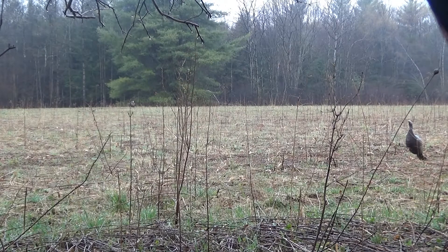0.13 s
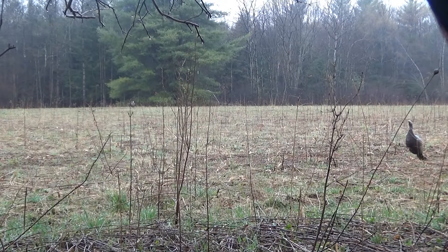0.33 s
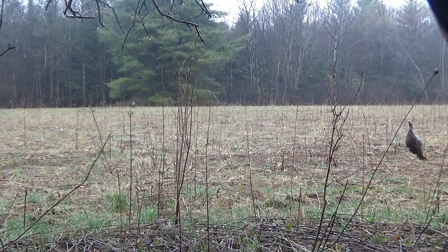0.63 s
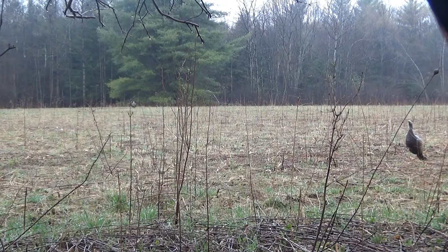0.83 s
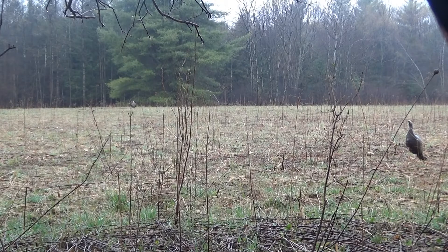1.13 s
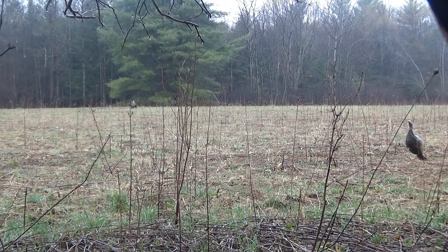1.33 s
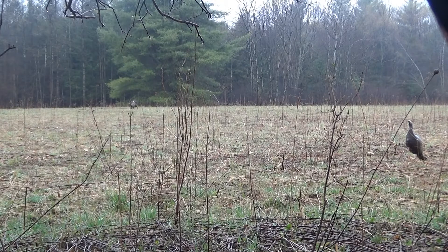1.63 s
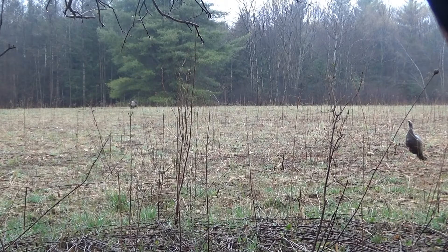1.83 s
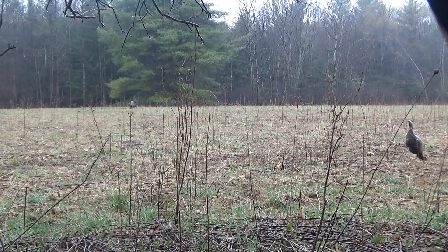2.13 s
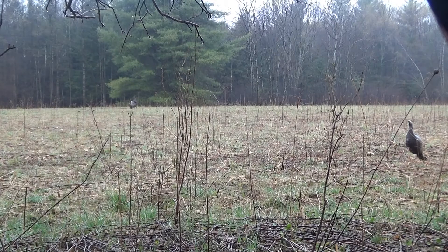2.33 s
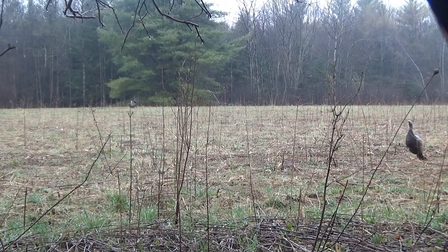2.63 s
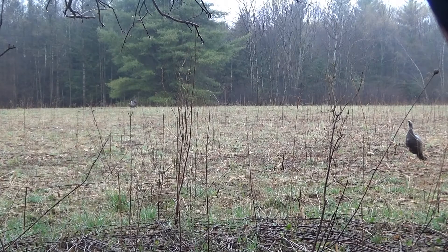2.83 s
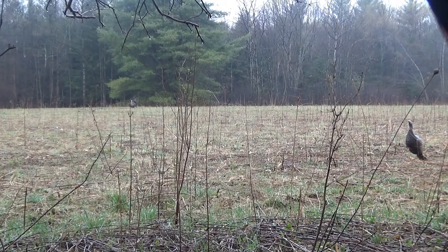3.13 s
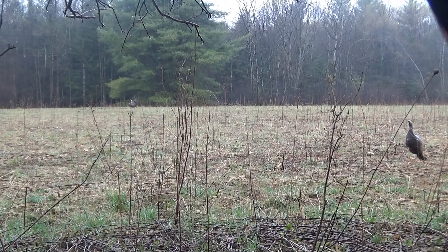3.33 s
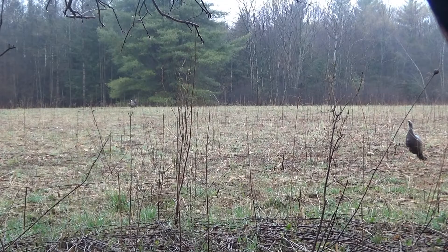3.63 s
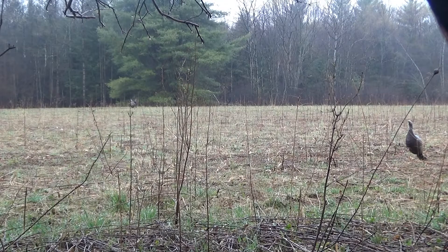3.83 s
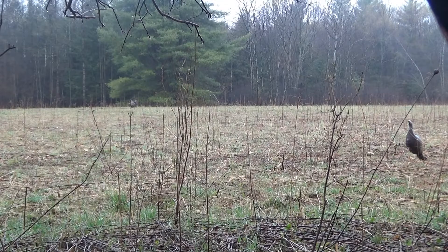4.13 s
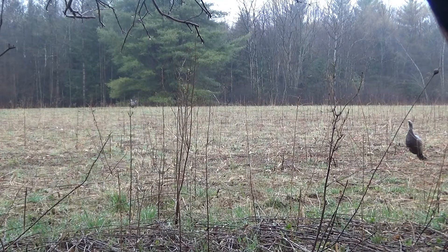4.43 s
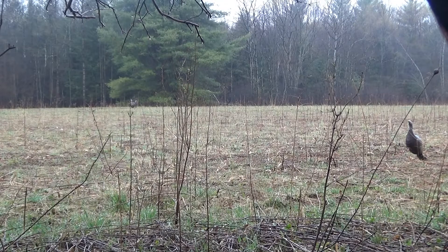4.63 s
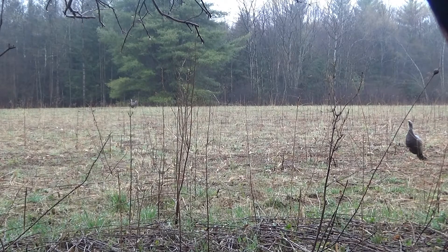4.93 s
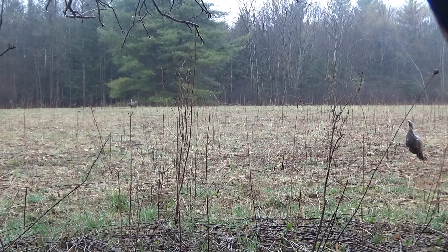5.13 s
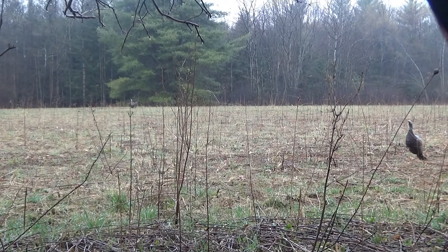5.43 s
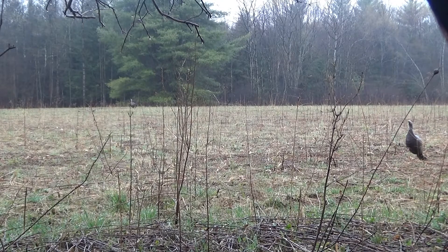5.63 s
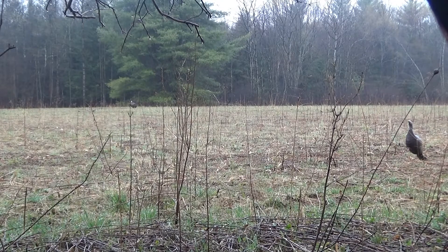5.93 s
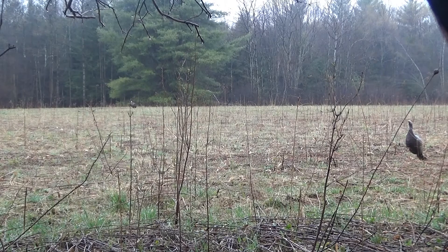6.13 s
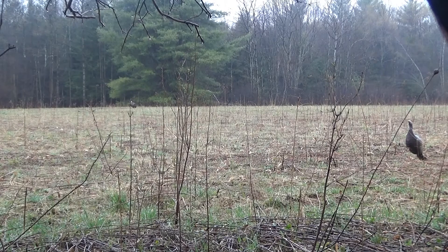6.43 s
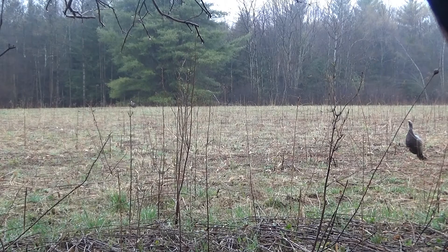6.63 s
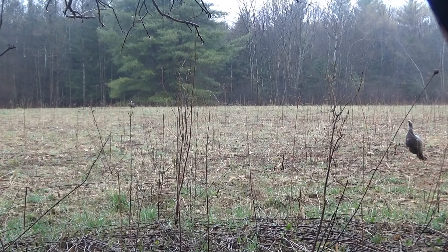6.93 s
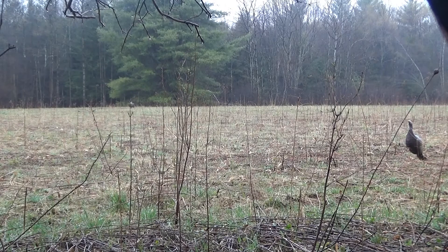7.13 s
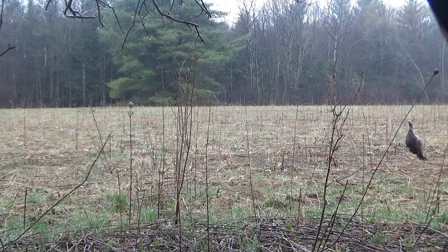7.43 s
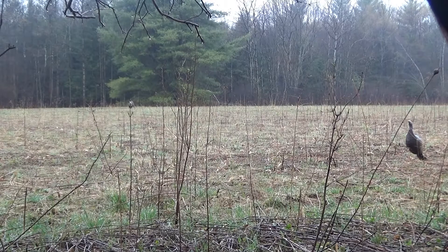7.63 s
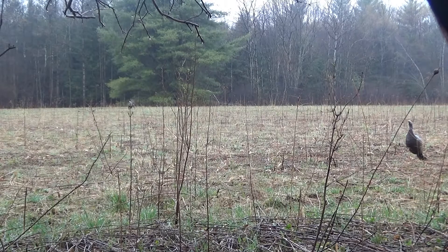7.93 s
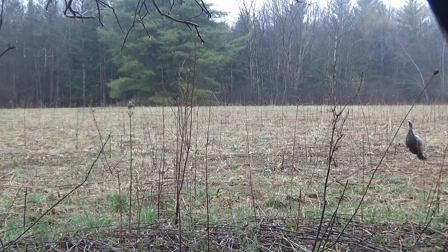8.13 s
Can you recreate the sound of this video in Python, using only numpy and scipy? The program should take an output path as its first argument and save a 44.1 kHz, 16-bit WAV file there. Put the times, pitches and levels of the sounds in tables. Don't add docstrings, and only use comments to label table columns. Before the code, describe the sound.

A quiet open field edged by woods, with soft low rumble, distant traffic, a faint wavering engine hum and thin microphone hiss. At 0.5 s a turkey close by on the right begins with a faint pip and a soft, high, clear yelp, alongside a tiny chirp. Hoarse yelps follow at about 0.85, 1.2, 1.6, 1.95, 2.3, 2.7 and 3.0 s, each roughly a tenth of a second, starting high and dropping into a raspy, fluttering, breathy tone; the last few are loudest. The background dips after the loud calls, then slowly rises. Soft far clucks come near 3.4 s and a faint one at 4.9 s. From 5.7 to 6.5 s a farther tom gives a rapid, uneven, rattling gobble, its tone lingering off the trees. Dry twig ticks and little drips are scattered throughout, with crisp ticks around 8.0 s before the end.

```python
import sys
import numpy as np
from scipy import signal
from scipy.fft import rfft, irfft, next_fast_len
from scipy.io import wavfile
from scipy.ndimage import uniform_filter1d, map_coordinates

SR = 44100
rng = np.random.default_rng(int(sys.argv[2]) if len(sys.argv) > 2 else 0)


def wav_out(sig):
    wavfile.write(sys.argv[1], SR, np.round(np.clip(np.atleast_2d(sig).T, -1, 1) * 32767).astype(np.int16))


def rack_gain(trim_db):
    fader = np.asarray(trim_db, float)
    return 10 ** (fader / 20)


N = 365280

# centre time [s], pitch [Hz], length [s], throat level [dB], open beak [dB re throat].
GOBBLE_NOTES = [(5.679, 526, 0.018, -23.5, -15.5), (5.736, 572, 0.043, -29, -10),
                (5.751, 636, .004, -28, 0), (5.812, 534, .015, -45.5, 5), (5.869, 690, 0.018, -38, 5),
                (5.906, 552, .01, -29, 5), (5.935, 611, 0.048, -35, 3.5), (5.947, 624, 0.012, -27.5, -3.5),
                (6.012, 591, .014, -31.5, -1.5), (6.062, 634, 0.026, -37, 4), (6.109, 614, 0.055, -31.5, 6),
                (6.115, 650, 0.017, -30.5, -3.5), (6.175, 579, 0.019, -36.5, -2.5),
                (6.218, 592, 0.015, -42.5, 5), (6.301, 564, .024, -35.5, -5.5),
                (6.361, 573.6, .013, -34.5, -1), (6.387, 565, 0.017, -41.5, 9.5),
                (6.468, 550, 0.022, -38.5, -5), (6.523, 589, 0.034, -45.5, 1.5)]
# time [s], centre [Hz].
TOM_THROAT = [(5.72, 1770), (5.75, 1380), (5.82, 1310), (5.87, 2000), (5.905, 1050), (5.95, 1980),
              (6.06, 1220), (6.1, 1850), (6.3, 1830)]
# frequency [Hz], t60 [s].
BRUSH_DECAY = [(500, 0.066), (1700, 0.089), (4000, 0.11), (9000, 0.034)]


def unit(x):
    return x / np.sqrt(np.mean(x ** 2) + 1e-20)


def along(points, hz):
    f, v = np.transpose(points)
    return np.interp(np.log(hz + 1), np.log(f + 1), v)


def curves(rows, t):
    s, *cols = np.transpose(rows)
    return [np.interp(t, s, c) for c in cols]


def wobble(rate_hz, size=N):
    knots = rng.standard_normal(int(size * rate_hz / SR) + 4)
    return map_coordinates(knots, [np.arange(size) * rate_hz / SR])


def fuzzy_phase(hz):
    return 2 * np.pi * np.cumsum(hz) / SR


def filtered(x, response):
    size = x.shape[-1]
    m = next_fast_len(size + 8192)
    return irfft(rfft(x, m) * response(np.fft.rfftfreq(m, 1 / SR)), m)[..., :size]


def resonances(modes):
    def response(f):
        return sum((-1) ** k * rack_gain(db) * 1j * f * width / (centre * centre - f * f + 1j * f * width)
                   for k, (centre, width, db) in enumerate(modes))
    return response


def band(lo_hz, hi_hz):
    return lambda f: 1 / (1 + (lo_hz / (f + 1)) ** 6) / (1 + (f / hi_hz) ** 6)


def pulses(phase, hz):
    return sum(np.cos(k * phase) * (k * hz < 15000) for k in range(1, 28))


def echoes(x, decay, delay_s):
    hz, t, z = signal.stft(rng.standard_normal((2, SR)), SR, nperseg=256)
    decay_db = -60 * t / along(decay, hz)[:, None]
    tail = signal.istft(z * rack_gain(decay_db), SR, nperseg=256)[1]
    delayed = np.pad(x, (int(delay_s * SR), 0))
    return signal.fftconvolve(delayed[None], tail / np.linalg.norm(tail[0]), axes=1)


def push(attack_s, hold_s, low_hz, sag_db, rise):
    attack_power, sag_power, release_db_per_s = 1.28, 2.7, 900
    opening_rise, settle_share, fall_power = 0.9, 0.88, 1.5
    droop, rise_power, early_climb = 0.05, 3.4, 2.2
    t = np.arange(round((attack_s + hold_s) * SR) + SR // 20) / SR
    late = np.maximum(t - attack_s, 0) / hold_s
    effort_db = 20 * attack_power * np.log10(np.clip(t / attack_s, 0.01, 1))
    effort_db -= sag_db * np.minimum(late, 1) ** sag_power
    effort_db -= release_db_per_s * np.maximum(t - attack_s - hold_s, 0)
    opening = droop * (1 - np.minimum(late, 1))
    opening += opening_rise * np.maximum(1 - t / (settle_share * attack_s), 0) ** fall_power
    closing = rise * np.minimum(late, 1.4) ** (rise_power / (1 + early_climb * rise))
    return effort_db, low_hz * (1 + opening + closing)


def yelps():
    # start [s], attack [s], hold [s], peak [dB], lowest pitch [Hz].
    calls = [
        (0.5, 0.01, 0.0027, -40, 783),
        (0.527, .006, 0.093, -46, 793),
        (0.836, .065, .03, -23.5, 523),
        (1.222, .022, .088, -21, 580),
        (1.565, 0.043, 0.073, -13.5, 517),
        (1.944, 0.049, .065, -18, 569.5),
        (2.301, .03, 0.087, -13, 530),
        (2.671, 0.025, 0.069, -12.5, 528.3),
        (2.997, 0.013, .065, -13, 510.4),
    ]
    roughness = [.9, .9, .85, .75, .65, .55, .7, .7, .8]
    # brightness [dB], throat pitch factor, sag over the hold [dB], closing pitch rise [share].
    shapes = [(3, 1.1, -1, -0.091), (18, .93, 23, -0.1), (2, 1.0, 6, 0.35), (0, 1.02, 3.5, .5),
              (1, 1.028, 5.5, 0.014), (5.5, 1, 17, .6), (7, 1.01, 1.5, .07), (6.5, 1.01, 8, .08),
              (-0.5, 1.029, -0.4, -.02)]
    # clear tone, breath hiss [dB re the usual].
    mixes = [(-6, -1), (-8, -6), (-2, -0.5), (3, -3.5), (-0.5, 2.5), (4.5, 1), (-1, 1), (-1, 0), (0, -1.5)]
    # centre [Hz], width [Hz], level [dB].
    throat_modes = [(1104, 410, -8), (1480, 87, 0), (1651, 46, 4.5), (1800, 40, 4), (1980, 88, -2),
                    (2370, 260, -11.5), (3010, 170, -7.5), (3373, 44, -4), (3603, 115, -9),
                    (4350, 400, -23)]
    # frequency [Hz], density [dB per Hz].
    breath_spectrum = [(2530, -60), (4300, -10), (5810, -13), (6900, -8), (7510, -2.5), (7910, -1),
                       (8960, -10), (11100, -37), (12000, -21), (15600, -66), (22000, -120)]
    # frequency [Hz], left-right balance [dB].
    balance = [(200, -4), (700, -1), (1300, -4.5), (4400, -3), (8000, 1.5)]
    usual_tone_db, usual_hiss_db = -15, -16
    weak_tone, weak_hiss, weak_top_db = 0.69, 0.16, 17
    sag_tone, close_tone_db_per_s = 0.47, 300

    def sides(f):
        gain = rack_gain(np.outer([0.5, -0.5], along(balance, f)))
        return gain * np.exp(-1j * np.outer([1, -1], 0.4 * band(900, 3600)(f)))

    out = np.zeros((2, N + 2 * SR))
    for call_row, rough, shape, (clear_db, breath_db) in zip(calls, roughness, shapes, mixes):
        s, attack_s, hold_s, peak_db, low_hz = call_row
        bright_db, factor, sag_db, rise = shape
        effort_db, hz = push(attack_s, hold_s, low_hz, sag_db, rise)
        size = len(hz)
        age = np.arange(size) / SR
        weak_db = np.minimum(-effort_db, weak_top_db)
        tone_db = usual_tone_db + clear_db + weak_tone * weak_db - sag_tone * weak_db * (age > attack_s)
        tone_db -= close_tone_db_per_s * np.maximum(age - attack_s - hold_s, 0)
        hiss_db = usual_hiss_db + breath_db + weak_hiss * weak_db

        phase = fuzzy_phase(hz * (1 + 0.0189 * wobble(314.3, size)))
        gated = rng.standard_normal(size) * (1 + np.cos(phase)) ** 2
        beat = fuzzy_phase(122 * (1 + 0.198 * wobble(52.8, size)))
        bursts = rack_gain(1.1 * wobble(280, size)) * (1 + 0.3 * np.cos(beat))
        air = bursts * (np.sqrt(1 - rough) * unit(pulses(phase, hz)) + np.sqrt(rough) * unit(gated))

        def throat(f):
            return resonances(throat_modes)(f / factor) * rack_gain(bright_db * band(2600, 9000)(f))

        rasp = unit(filtered(filtered(air, throat), band(570, 3610)))
        breath = bursts ** 0.66 * rng.standard_normal(size)
        hiss = unit(filtered(breath, lambda f: rack_gain(along(breath_spectrum, f))))
        tone = np.sqrt(2) * rack_gain(2.2 * wobble(160, size)) * np.sin(phase)
        call = rack_gain(peak_db + effort_db) * (rasp + rack_gain(tone_db) * tone + rack_gain(hiss_db) * hiss)

        start = round(s * SR)
        out[:, start:][:, :size] += filtered(call, sides)
        wet = rack_gain(-8) * echoes(filtered(call, band(800, 14000)), BRUSH_DECAY, delay_s=0.002)
        out[:, start:][:, :wet.shape[1]] += wet
    return out[:, :N]


def gobble():
    grits = [.9, 1.7, .5, 1.5, 1.8, 1.5, 1.6, 1.3, .8, 1.8, 1.2, .5, 1.1, 1.6, .6, .8, 1.5, .8, 1.4]
    spit_db = [-18, -11, 0.5, -10, -10, -13, -9, -14.5, -17, -11, -6, -1, -12, -10, -15, -10, -2, -18, -11]
    # frequency [Hz], t60 [s].
    tree_decay = [(700, 0.59), (1100, 4.5), (1800, 0.63), (2600, 1.2), (5000, 0.061), (10000, 0.048)]
    dry = np.zeros(N)
    t = np.arange(-2000, 2000) / SR
    size = len(t)
    for (s, hz, length_s, low_db, beak_db), grit, top_db in zip(GOBBLE_NOTES, grits, spit_db):
        phase = fuzzy_phase(hz * (1 + 0.007 * (1 + 1.4 * grit) * wobble(250, size)))
        gated = rng.standard_normal(size) * (1 + np.cos(phase))
        air = unit(pulses(phase, hz)) + grit * unit(filtered(gated, lambda f: np.sqrt(f / 4000)))

        throat = resonances([(curves(TOM_THROAT, s)[0], 600, 0)])
        low = unit(filtered(air, lambda f: throat(f) ** 2 * band(950, 2600)(f)))
        beak_modes = [(rng.uniform(2200, 2500), 400, -1), (rng.uniform(3100, 3600), 600, 0),
                      (rng.uniform(4500, 5800), 1200, -4)]
        beak = unit(filtered(filtered(air, resonances(beak_modes)), band(1500, 6600)))
        spit = unit(filtered(air, lambda f: band(6200, 10000)(f) * band(100, 11500)(f)))

        low_swell = np.exp(-(t / (0.48 * length_s + 0.008)) ** 2)
        beak_swell = np.exp(-(t / (0.81 * min(length_s, 0.024))) ** 2)
        note = low_swell * low + beak_swell * (rack_gain(beak_db) * beak + rack_gain(top_db) * spit)
        level = rack_gain(low_db + 2 * grit * wobble(200, size))
        dry[round(s * SR) - 2000:][:size] += level * note
    near = echoes(dry, BRUSH_DECAY, delay_s=0.0044)[:, :N]
    far = echoes(dry, tree_decay, delay_s=0.028)[:, :N]
    return dry + rack_gain(-10) * near + rack_gain(-13) * far


def ring(held, pitch, blur_hz):
    detune_octaves, echo_rise_s = 0.34, 0.0061
    t = np.arange(N) / SR
    db, t60_s, far_db, far_t60_s = held
    power = np.zeros(N)
    for s, _, _, low_db, _ in GOBBLE_NOTES:
        detune = abs(np.log2(curves(TOM_THROAT, s)[0] / curves(pitch, s)[0]))
        fed_db = low_db + db - 4.3 * (detune / detune_octaves) ** 2
        age = np.maximum(t - s + echo_rise_s, 0)
        fade = rack_gain(-120 * age / t60_s) + rack_gain(2 * far_db - 120 * age / far_t60_s)
        power += rack_gain(2 * fed_db) * np.minimum(age / echo_rise_s, 1) ** 2 * fade
    carrier = np.exp(1j * fuzzy_phase(curves(pitch, t)[0]))

    def flutter():
        return wobble(blur_hz) + 1j * wobble(blur_hz)

    shared = flutter()
    left = (shared + 0.5 * flutter()) * carrier
    right = (shared + 0.5 * flutter()) * carrier
    return np.sqrt(power) * unit(np.real([left, right]))


def held_by_trees():
    # time [s], frequency [Hz].
    low_hz = [(5.72, 1263), (5.855, 1267), (5.87, 1101), (6.149, 1102), (6.301, 1026), (6.9, 1024)]
    high_hz = [(5.66, 1613), (5.73, 1620), (5.781, 1750), (5.95, 1856), (6.101, 1800), (6.202, 1720),
               (7.1, 1698)]
    # level [dB re note], t60 [s], far trees [dB], their t60 [s].
    held_low = (-8, 2.7, -13, 3)
    held_high = (-2.5, 0.25, -20, 5)
    return ring(held_low, low_hz, blur_hz=220) + ring(held_high, high_hz, blur_hz=210)


def clucks():
    # centre time [s], pitch [Hz], level [dB], length [s].
    cluck_rows = [(3.35, 1150, -51.5, .03), (3.412, 650, -40, 0.013), (3.468, 1850, -54, .05),
                  (3.45, 700, -44, 0.075), (3.48, 1200, -53, .05), (3.509, 760, -47, .02),
                  (4.87, 2750, -51, .035), (.512, 1650, -29, .016), (.542, 1600, -37, .018),
                  (.866, 4200, -43, .03)]
    out = np.zeros(N)
    t = np.arange(-3000, 3000) / SR
    size = len(t)
    for s, hz, db, length_s in cluck_rows:
        tone = np.sin(fuzzy_phase(hz * (1 + 0.02 * wobble(200, size))))
        tone = tone * (1 + 0.7 * wobble(150, size))
        out[round(s * SR) - 3000:][:size] += rack_gain(db) * np.exp(-(2 * t / length_s) ** 2) * tone
    return out


def ticks():
    # start [s], peak [dB], colour [Hz].
    twig_rows = [(.3242, -32, 3880), (.7831, -35, 8400), (1.202, -33, 3530), (1.7837, -40, 8250),
                 (1.7976, -35.5, 5300), (3.1767, -44, 8150), (3.268, -39.5, 3930), (3.4327, -39, 3960),
                 (3.4812, -30, 7200), (3.4953, -38, 9310), (3.809, -39.5, 7540), (4.066, -34, 2820),
                 (4.0645, -30.5, 8300), (4.185, -44, 3010), (4.3051, -38.5, 7100), (4.4598, -43, 7800),
                 (4.6373, -38, 3730), (4.8429, -40, 4590), (6.252, -28, 7400), (6.617, -33, 7000),
                 (6.8573, -36.5, 7900), (7.5388, -40, 8010), (7.7724, -35, 3270), (8.0042, -29, 5600),
                 (8.021, -27.5, 6060)]
    drip_rows = [(.7394, -41, 7280), (4.1814, -42, 9810), (4.3494, -47, 8560), (4.3994, -52, 9030),
                 (4.5794, -51, 7050), (4.8429, -38, 9620), (4.958, -36.5, 9700), (5.0194, -47, 8110),
                 (7.7218, -39, 9400)]
    # width [octaves], t60 [s].
    twig_burst = (0.49, 0.031)
    drip_burst = (.4, 0.02)
    events = [(*row, *twig_burst) for row in twig_rows] + [(*row, *drip_burst) for row in drip_rows]
    out = np.zeros(N + SR)
    t = np.arange(SR // 8) / SR
    for s, db, hz, octaves, t60_s in events:
        noise = filtered(rng.standard_normal(len(t)),
                         lambda f: np.exp(-(np.log2((f + 1) / hz) / octaves) ** 2))
        out[round(s * SR):][:len(t)] += rack_gain(db - 8.5 - 60 * t / t60_s) * unit(noise)
    return out[:N] + rack_gain(-4.5) * echoes(out, BRUSH_DECAY, delay_s=0.011)[:, :N]


def rush(spectrum, patchy_db):
    # frequency [Hz], left-right likeness [0-1].
    likeness = [(60, 1), (130, 1.0), (290, 0.98), (640, 0.8), (1410, 0.6), (3100, 0.3), (6820, 0.82),
                (15000, 1)]
    z = signal.stft(rng.standard_normal((2, N)), nperseg=512)[2]
    patches = uniform_filter1d(uniform_filter1d(rng.standard_normal(z.shape[1:]), 6, 0), 14, 1)
    pair = signal.istft(z * rack_gain(patchy_db * unit(patches)), nperseg=512)[1][:, :N]

    def mid_side(hz):
        turn = np.arccos(np.clip(along(likeness, hz), -1, 1)) / 2
        return rack_gain(along(spectrum, hz)) * [np.cos(turn), np.sin(turn)]

    mid, side = filtered(pair, mid_side)
    return np.array([mid + side, mid - side]) / np.std(mid)


def field():
    # frequency [Hz], density [dB per Hz].
    rumble = [(18, -35), (30, -13), (59, -4), (107, -1), (134, -3), (147, -0.5), (166, -7), (184, -5.5),
              (233, -6), (273, -11), (393, -20), (425, -50.5), (450, -27.5), (580, -39), (990, -120)]
    traffic = [(210, -16.5), (350, -4.5), (428, -4), (655, -0.5), (991, -0.5), (1480, -8.5), (1720, -8),
               (2440, -12.5), (7000, -33), (9100, -47), (15400, -120)]
    preamp = [(1760, -45), (3000, 0.5), (3240, -4), (5600, -6.5), (8820, -7), (14900, -13), (16000, -11)]
    # time [s], gain [dB].
    camera_gain = [(0, -0.35), (1.55, 0.5), (1.64, -7), (2.4, -5.5), (3.2, -6), (3.6, -4.5), (4.6, -2.5),
                   (5.2, -1), (5.66, 0.4), (6.18, 4), (6.4, 2.5), (6.75, 0.8), (7.5, -1), (8.28, 0.2)]
    # time [s], level [dB].
    engine = [(0, -39), (1.5, -42.5), (2.4, -41.5), (3, -46), (3.36, -44.5), (3.6, -47), (4.27, -45.5),
              (4.63, -55), (5.07, -43), (5.4, -41), (6.18, -48), (6.39, -43), (6.75, -49), (8.28, -55)]
    t = np.arange(N) / SR
    hum = np.sqrt(2) * rack_gain(0.67 * wobble(10)) * np.sin(fuzzy_phase(143 + 4 * wobble(9)))
    road = rack_gain(-40) * rush(rumble, patchy_db=1) + rack_gain(-45) * rush(traffic, patchy_db=0.8)
    hiss = rack_gain(-54.5) * rush(preamp, patchy_db=-1.5)
    return rack_gain(curves(camera_gain, t)[0]) * (road + rack_gain(curves(engine, t)[0]) * hum + hiss)


def scene():
    return yelps() + gobble() + held_by_trees() + clucks() + ticks() + field()


def top_cut(x):
    return signal.sosfilt(signal.butter(12, 16150, fs=SR, output="sos"), x)


def record(dry):
    top_hz, starve_hz, starve_db, starve_s = 15830, 10900, -16, 0.023
    clipped = dry / (1 + np.abs(dry) ** 20) ** (1 / 20)
    power = uniform_filter1d(np.mean(clipped ** 2, axis=0), int(starve_s * SR))
    kept = 1 / (1 + (np.abs(power) / rack_gain(2 * starve_db)) ** 2)
    low = filtered(clipped, lambda f: f < starve_hz)
    top = filtered(clipped, lambda f: (f >= starve_hz) & (f < top_hz))
    return top_cut(low + kept * top)


dry = scene()
out = record(dry)
wav_out(out)
```